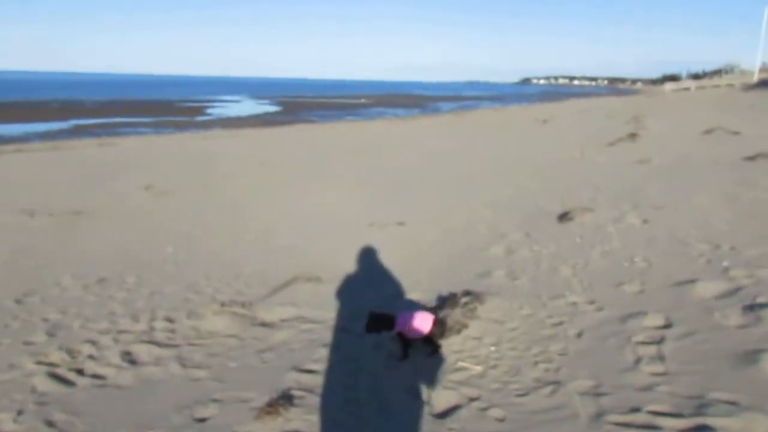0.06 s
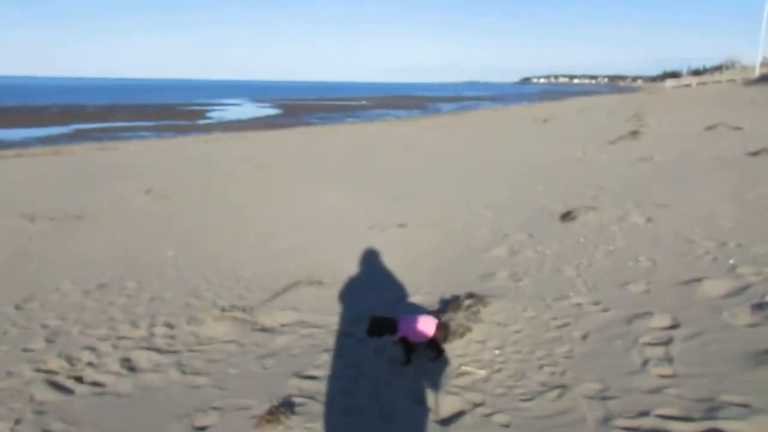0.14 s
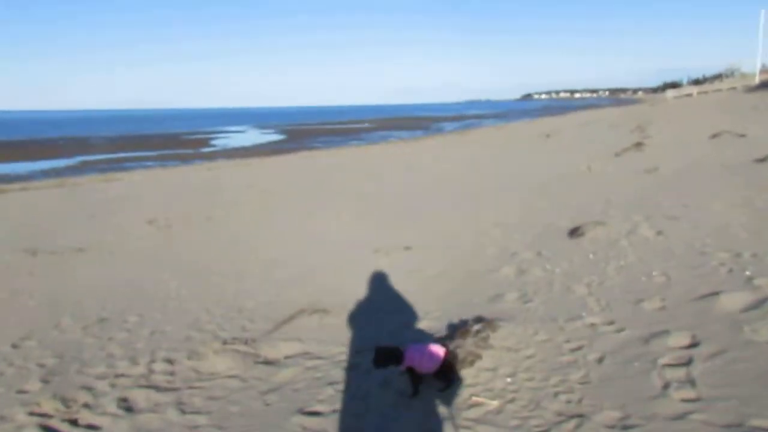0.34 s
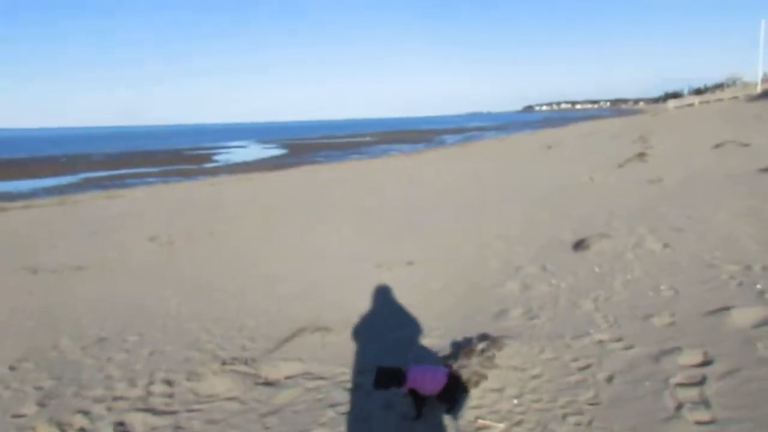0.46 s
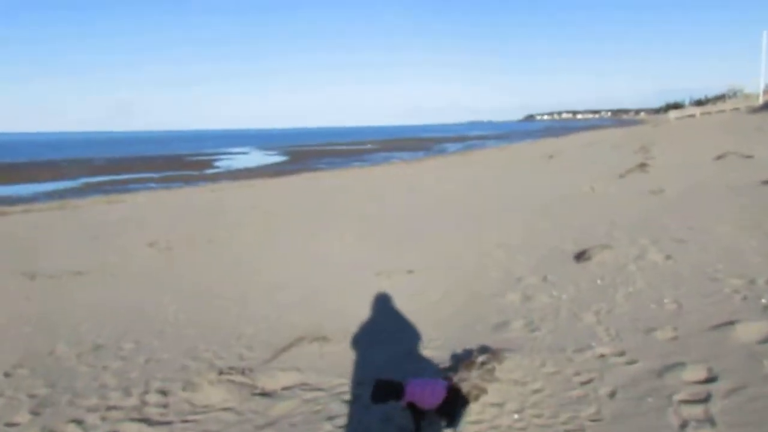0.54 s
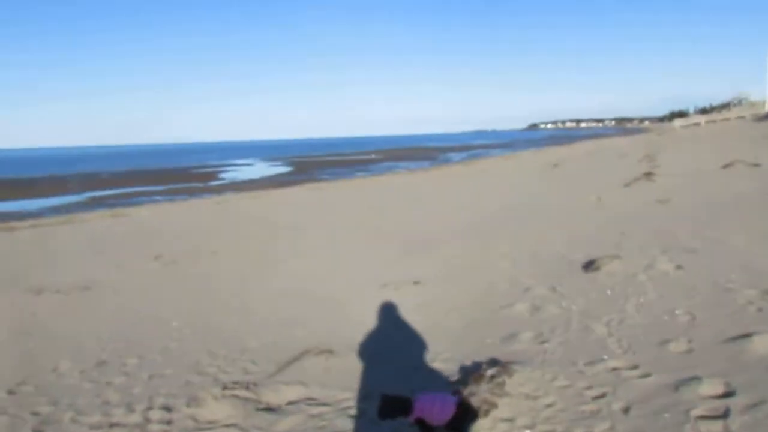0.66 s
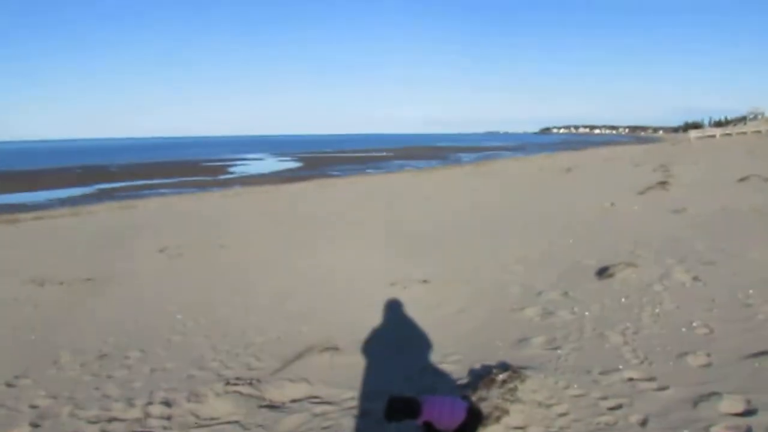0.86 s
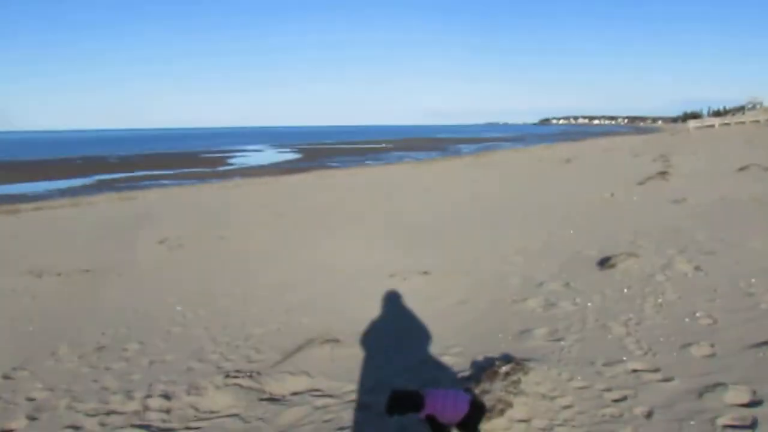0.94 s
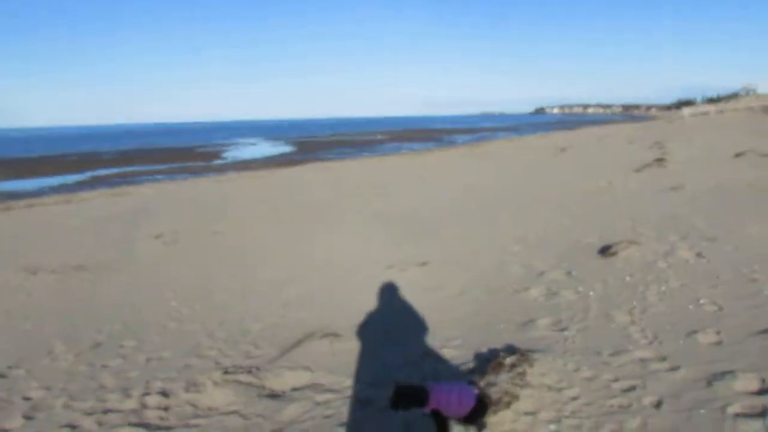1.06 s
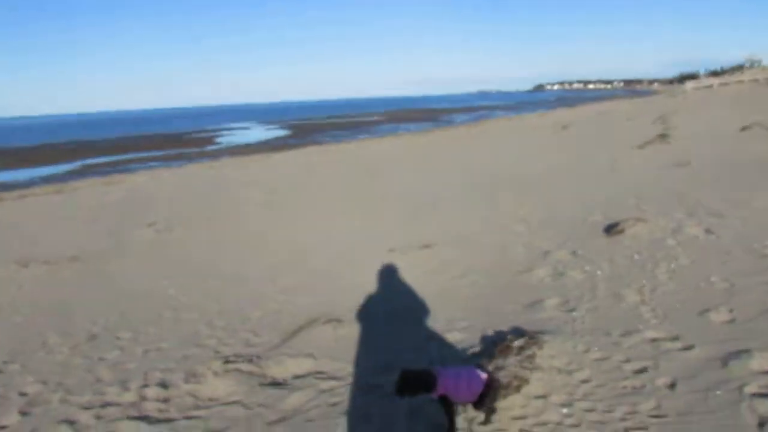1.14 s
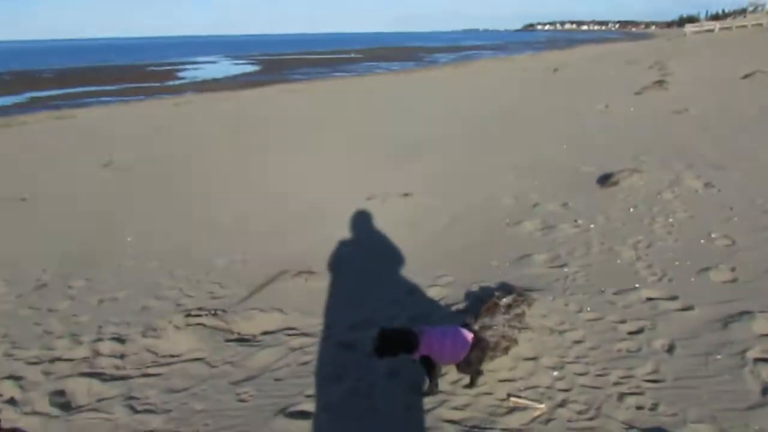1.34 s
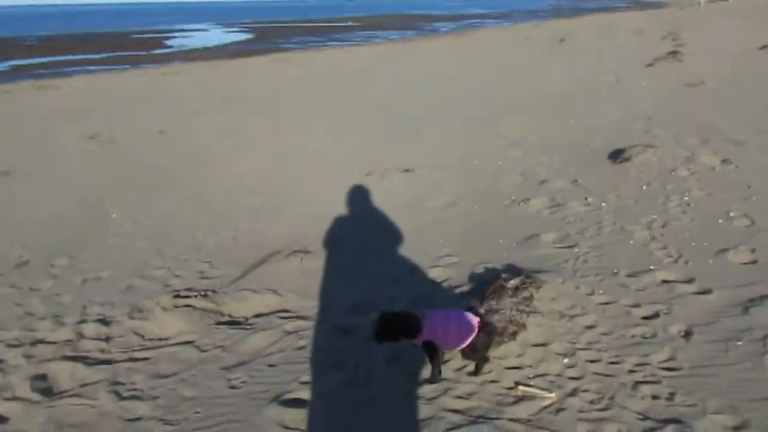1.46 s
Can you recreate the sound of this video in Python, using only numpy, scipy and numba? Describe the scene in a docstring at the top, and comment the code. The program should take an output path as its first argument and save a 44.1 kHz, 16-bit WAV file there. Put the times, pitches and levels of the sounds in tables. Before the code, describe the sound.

Wind buffets the microphone in low, fluttering gusts, with faint handling rubs and clicks.

```python
"""On a beach, wind buffets the microphone of a hand-held camera over the faint wash of the sea.
Swirling air rumbles, flutters and thumps, with the hardest gust near 0.87 s.
A finger rubs the camera's shell, dry and gritty, among a few ticks; the rubbing cuts off with a click.
From about 1 s a small zoom motor whirs faintly under the dying wind."""
import sys
import numpy as np
from scipy import signal
from scipy.fft import rfft, irfft
from scipy.io import wavfile
from scipy.ndimage import uniform_filter1d
from numba import njit

SR = 44100
rng = np.random.default_rng(int(sys.argv[2]) if len(sys.argv) > 2 else 0)


def master(y):
    """Save y as 16-bit WAV."""
    cut = np.clip(np.atleast_2d(y).T, -1, 1)
    pcm = np.round(cut * 32767)  # scale
    wavfile.write(sys.argv[1], SR, pcm.astype(np.int16))


N = 66150  # 1.5 s

# How well the camera's shell passes each frequency: f/Hz, level/dB
SHELL_TONE = [(300, -7.5), (800, -15.5), (1120, -3), (1500, -41), (2100, -20), (2650, -11), (3100, -21),
              (3800, -13), (4300, -30), (5000, -19.5), (5700, -9.5), (6950, -3), (7500, -4), (7830, -17.5),
              (8300, -6), (9400, -2.5), (10400, -8), (12000, -22), (13500, -22), (16000, -48)]


def undb(db):
    """Turn decibels into a factor to multiply by."""
    return 10 ** (np.asarray(db) / 20)


def unit(x):
    """Scale a signal to an average strength (rms) of 1."""
    return x / np.sqrt(np.mean(x ** 2))


def curve(t, rows):
    """Join (time, value) rows with straight lines."""
    return np.interp(t, *np.array(rows).T)


def swell(t, at, half_length):
    """A bell-shaped rise and fall around one moment."""
    return np.exp(-((t - at) / half_length) ** 2 / 2)


def noise():
    """White noise: an even hiss."""
    return rng.standard_normal(N)


def specks(per_s, spread_db):
    """Tiny clicks of uneven size at random moments."""
    return noise() * (rng.random(N) < per_s / SR) * undb(spread_db * rng.exponential(size=N))


def wander(per_s):
    """A smooth random drift of strength 1 that changes about per_s times a second."""
    size = max(int(SR / per_s), 1)
    smoothed = uniform_filter1d(noise(), size, mode="wrap")
    return unit(uniform_filter1d(smoothed, size, mode="wrap"))


def colour(x, points):
    """Shape the tone of a steady signal by (f/Hz, level/dB) points; strength 1."""
    hz, db = np.array(points).T
    f = np.maximum(np.fft.rfftfreq(N, 1 / SR), 1)
    gain = undb(np.interp(np.log(f), np.log(hz), db))
    return unit(irfft(rfft(x) * gain, N))


def noise_band(hz, width_hz):
    """Hiss gathered around one frequency; strength 1."""
    f = np.fft.rfftfreq(N, 1 / SR)
    return unit(irfft(rfft(noise()) / (1 + 2j * (f - hz) / width_hz) ** 2, N))


def even(x, samples):
    """Even out a noise so that its strength stays near 1."""
    return x / np.sqrt(uniform_filter1d(x ** 2, samples) + 1e-12)


@njit
def lowpass(x, hz):
    """Soften the treble above hz, which gives one frequency for each sample."""
    y, band, low = np.empty(len(x)), 0., 0.
    for i in range(len(x)):
        g = np.tan(np.pi * hz[i] / SR)
        v = (band + g * (x[i] - low)) / (1 + g * (g + 1.5))
        y[i] = low + g * v
        band, low = 2 * v - band, low + 2 * g * v
    return y


def sea():
    """The sea washes faintly, as a steady, dull noise."""
    # Tone of the wash: f/Hz, level/dB
    wash_tone = [(100, 1.5), (500, -14), (1100, -14), (2000, -28), (15000, -40)]
    return undb(-59) * colour(noise(), wash_tone)


def zoom_motor(t):
    """The motor gives one buzzing pulse each turn, over the hiss of its gears."""
    # Tone of the gear hiss: f/Hz, level/dB
    gear_tone = [(500, 0), (1200, -1), (1800, -5), (2400, -19), (3400, -13.5), (4400, -23.5), (7300, -19),
                 (8900, -13), (9600, 1.5), (10400, -12), (11900, -9), (13200, -23)]
    start_s, turns_per_s, buzz_hz, buzz_width_hz = .989, 131.8, 2870, 360
    turns = np.cumsum(turns_per_s * (1 + .01 * wander(25.2))) / SR  # the speed wobbles a little
    pulses = np.diff(np.floor(turns), prepend=0) * undb(wander(100))
    band = np.exp(-((np.fft.rfftfreq(N, 1 / SR) - buzz_hz) / buzz_width_hz) ** 2 / 2)
    buzz = undb(-69.5) * unit(irfft(rfft(pulses) * band, N))
    gears = undb(-56 + 3 * wander(300)) * colour(noise(), gear_tone)
    return (t > start_s) * (buzz + gears)


def ticks(t):
    """Noise bursts through the shell: ticks of grit, and a brief, soft rasp as the motor starts."""
    # Bursts (the slowest to fade is the rasp): t/s, level/dB, fade time/s
    bursts = [(0.183, -28, 0.00086), (.628, -33, 0.0017), (0.6312, -25, 0.0017), (0.688, -40, 0.0025),
              (0.7617, -42.5, 0.0024), (0.991, -57, 0.045), (1.158, -46, 0.001), (1.35, -47.5, 0.0015)]
    level = sum((t >= at) * undb(db) * np.exp(-np.maximum(t - at, 0) / fade) for at, db, fade in bursts)
    return level * colour(noise(), SHELL_TONE)


def clicks(t):
    """Cracks with a short ring: knocks on the shell, and one sharp click as the rubbing cuts off."""
    # Clicks (the one at 0.9195 s ends the rubbing): t/s, level/dB, crack compared with that level/dB
    click_list = [(.1905, -33, -24), (.2012, -17, -7), (.632, -34, 0), (.877, -21, -14), (.9195, -39, 7),
                  (.993, -37, -16)]
    # Notes the shell rings at: f/Hz, level/dB, time to fade by 60 dB/s
    shell_notes = [(1130, -2, 0.018), (1870, 1.5, 0.0098), (2710, 3.5, 0.012), (3060, 4, 0.0064)]
    crack_s = .00025
    crack = unit(lowpass(noise(), hz=np.full(N, 5000.)))
    out = np.zeros(N)
    for at, db, crack_db in click_list:
        age = np.maximum(t - at, 0)
        crack_fade = np.exp(-age / crack_s)
        out += (t >= at) * undb(db + crack_db) * crack_fade * crack
        for hz, note_db, ring_s in shell_notes:
            ring = np.sin(2 * np.pi * hz * age) * undb(-60 * age / ring_s)
            out += (1 - crack_fade) * undb(db + note_db) / 2 * ring  # builds up as the crack fades
    return out


def finger_rubbing(t):
    """Tiny slips ring the shell over the dull drag of skin, until the rubbing cuts off abruptly."""
    # Strokes: start/s, length/s, level/dB, rise time/s, time to fade 20 dB more/s, sag/(dB per s)
    strokes = [(0, 0.039, -34, 0.0032, 0.031, 16), (0.06, 0.0079, -35, 0.0085, 0.058, 46),
               (0.097, 0.12, -44.5, 0.089, 0.071, -14), (0.243, 0.061, -40, 0.014, 0.048, 46),
               (0.354, 0.058, -40, 0.021, 0.21, 20), (0.391, 0.21, -46, 0.1, 0.11, 18),
               (0.641, 0.021, -49, 0.0096, 0.0089, 0), (0.677, 0.019, -46.5, 0.017, 0.0081, 2),
               (0.709, 0.073, -57.5, 0.0032, 0.023, 19), (0.79, 0.039, -35, 0.024, 0.02, -9),
               (0.822, 0.052, -26.5, 0.044, 0.078, 2)]
    # The skin grips and drags harder: t/s, half length/s, level/dB
    grips = [(0.261, 0.011, -43.5), (0.506, .022, -44)]
    # Tone of dragging skin: f/Hz, level/dB
    drag_tone = [(400, 0), (800, -2), (1100, 2.5), (1450, -2.5), (2200, -2), (2600, 0), (3100, -7.5),
                 (3700, -4), (4600, -8.5), (9000, -21.5)]
    # The rub squeaks briefly: t/s, half length/s, f/Hz, level/dB
    squeals = [(.028, .014, 9450, -37), (0.259, 0.015, 5280, -40.5), (0.385, 0.016, 6950, -41),
               (0.52, 0.016, 5320, -52)]
    cutoff_s, hard_press_db = .921, -38
    power = 0
    for start, length, db, rise_s, fade_s, sag in strokes:
        age = np.maximum(t - start, 0)
        rise = np.clip(age / rise_s, 0, 1)
        fade_db = 20 * np.maximum(age - length, 0) / fade_s
        power += (rise * undb(db - sag * age - fade_db)) ** 2
    force = np.sqrt(power) * undb(1.5 * wander(84))
    slips = colour(specks(per_s=7000, spread_db=2), SHELL_TONE)
    hardness = np.minimum(force / undb(hard_press_db), 1) ** 2
    sizzle = undb(-10.5) * hardness * noise_band(hz=10700, width_hz=4500)
    grip = sum(undb(db) * swell(t, at, half) for at, half, db in grips)
    pull = undb(-44.5) * (force / undb(-37.5)) ** .46  # the drag grows more slowly than the slips
    drag = np.hypot(pull, grip) * colour(noise(), drag_tone)
    squeaks = sum(undb(db) * swell(t, at, half) * noise_band(hz, width_hz=400)
                  for at, half, hz, db in squeals)
    since_cutoff = np.maximum(t - cutoff_s, 0)
    ending = undb(-15 * np.minimum(since_cutoff / .0015, 1) - 170 * since_cutoff)  # drops, then fades
    return ending * (force * (slips + sizzle) + drag + squeaks)


def wind(t):
    """Air rumbles on the microphone and breaks into swirls that flutter and thump; the top gust rasps."""
    # Strength of the rumble: t/s, level/dB
    gusts = [(0, -36), (.05, -28), (.10, -33), (.15, -24.5), (.19, -38), (.25, -20.5), (.33, -20),
             (.37, -26), (.45, -27.5), (.62, -26), (.70, -19), (.79, -22), (.88, -14.5), (.93, -29),
             (.97, -35), (1.01, -27), (1.13, -23), (1.2, -30), (1.27, -37), (1.325, -26), (1.365, -44),
             (1.40, -33), (1.5, -35)]
    # Tone of the rumble: f/Hz, level/dB
    rumble_tone = [(15, -8), (28, -11), (48, 1.5), (82, 1.5), (145, -3.5), (220, -20), (330, -31),
                   (600, -45), (1500, -90)]
    # Strength of the flutter as the airflow breaks up: t/s, level/dB
    flutter_levels = [(0, -66), (.23, -62), (.27, -24), (.33, -24), (.36, -29), (.40, -23), (.415, -52),
                      (.57, -44), (.68, -28.5), (.80, -23.5), (.865, -15.5), (.905, -23), (.925, -39),
                      (.98, -32), (.995, -25), (1.04, -22), (1.09, -37), (1.14, -34), (1.18, -46),
                      (1.5, -49)]
    # Single swirls that thump the microphone: t/s, peak level/dB, half length/ms
    thumps = [(.2877, -12, 2.4), (0.3208, -11, 2.4), (0.3895, -9, 1.7), (0.7225, -8.5, 1.7),
              (0.817, -5, 1.8), (0.8583, -7.5, 1.1), (0.8645, -9, 1.2), (.877, -5.5, 1.4),
              (0.902, -13, 0.8), (0.931, -15, 1.15), (1.0205, -8, 0.8)]
    rumble = even(colour(noise(), rumble_tone), samples=1100) * undb(curve(t, gusts) + wander(90))
    flutter_db = curve(t, flutter_levels)
    edge_hz = np.clip(350 * 2 ** (.04 * (flutter_db + 30)), 250, 2000)  # louder flutter is brighter
    bass_cut = signal.butter(3, 125, "high", fs=SR, output="sos")
    swirls = signal.sosfilt(bass_cut, specks(per_s=610, spread_db=4))
    for _ in range(3):
        swirls = lowpass(swirls, edge_hz)
    flutter = even(swirls, samples=1000) * undb(flutter_db + 1.5 * wander(79))
    air = rumble + flutter
    for at, peak_db, half_ms in thumps:
        offset = (t - at) / (half_ms * 1e-3)
        air += undb(peak_db) * (1 - 1.5 * offset ** 2) / (1 + offset ** 2 / 2) ** 3  # spike between dips
    rasp = undb(-20) * swell(t, at=.874, half_length=.019) * air * noise_band(hz=905, width_hz=430)
    return air + rasp


def scene():
    """Add the wind, the camera's noises and the sea into one channel."""
    t = np.arange(N) / SR
    return (wind(t) + finger_rubbing(t) + ticks(t) + clicks(t) + zoom_motor(t) + sea())[None]


def record(dry):
    """Flatten any peaks beyond full scale, then cut off the highest treble."""
    top_hz = 15750
    treble_cut = signal.ellip(10, .2, 80, top_hz, fs=SR, output="sos")
    return signal.sosfilt(treble_cut, np.clip(dry, -1, 1))


dry = scene()
out = record(dry)
master(out)
```